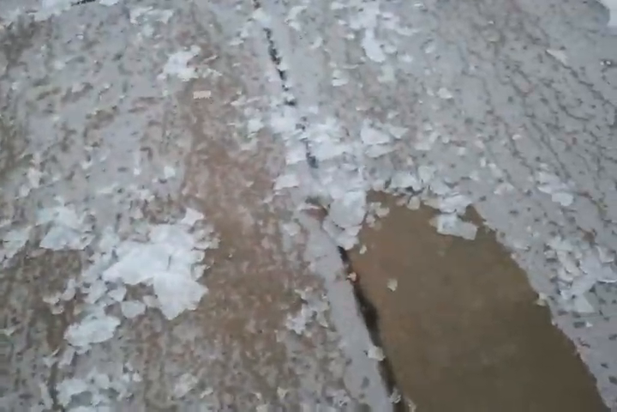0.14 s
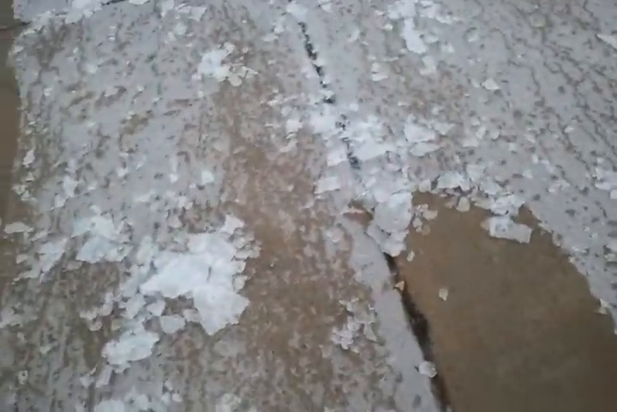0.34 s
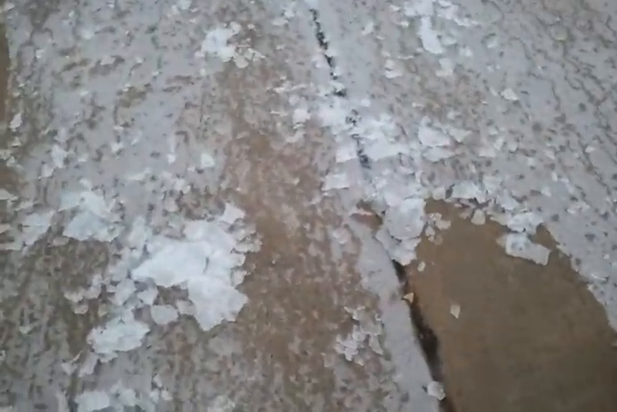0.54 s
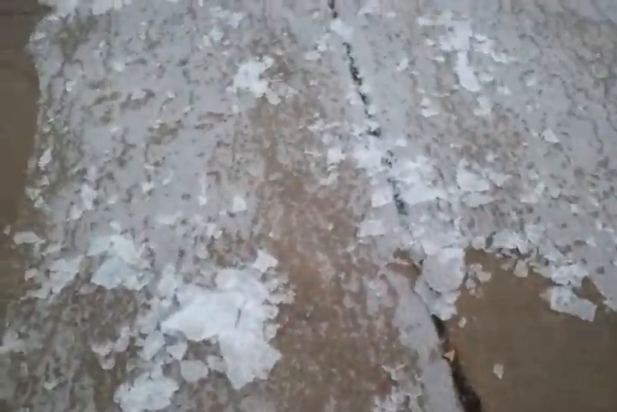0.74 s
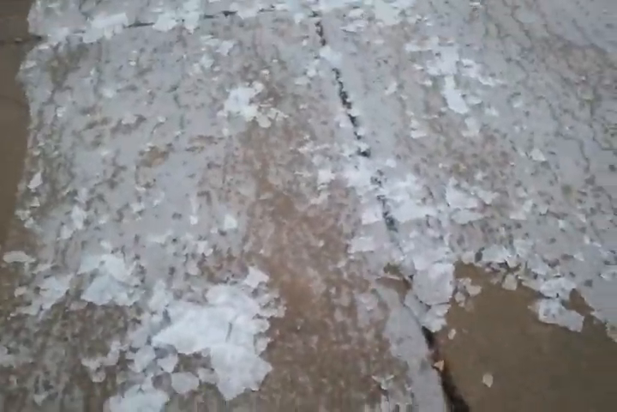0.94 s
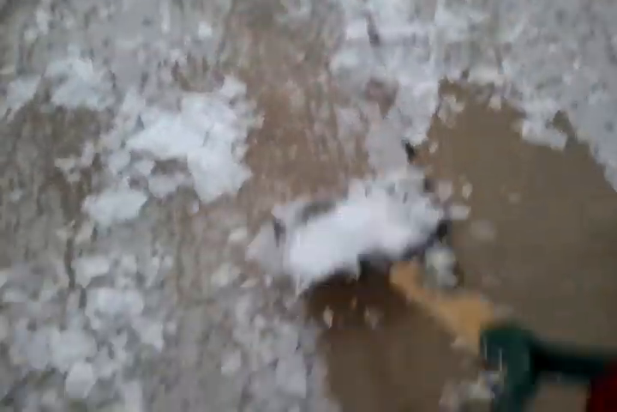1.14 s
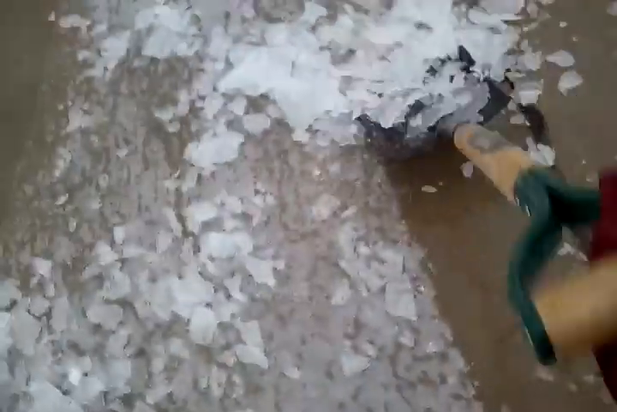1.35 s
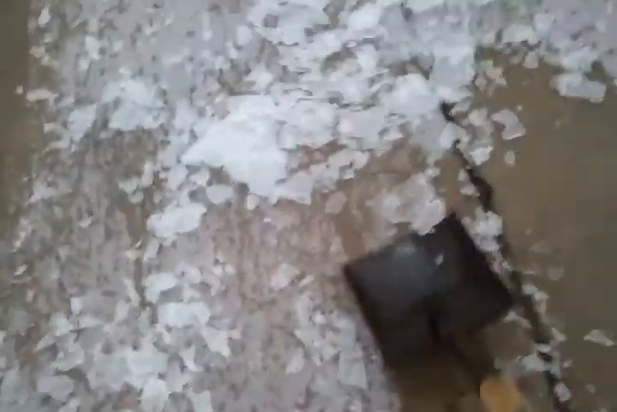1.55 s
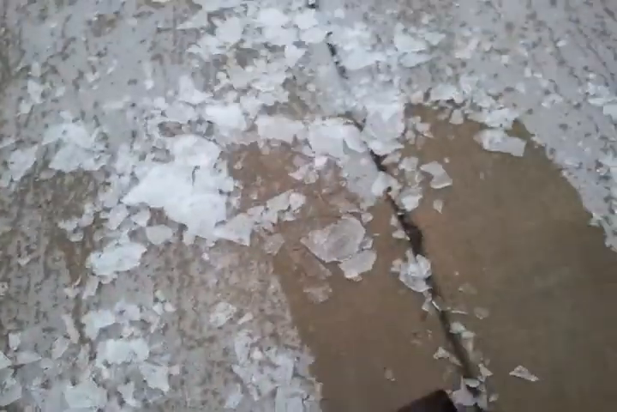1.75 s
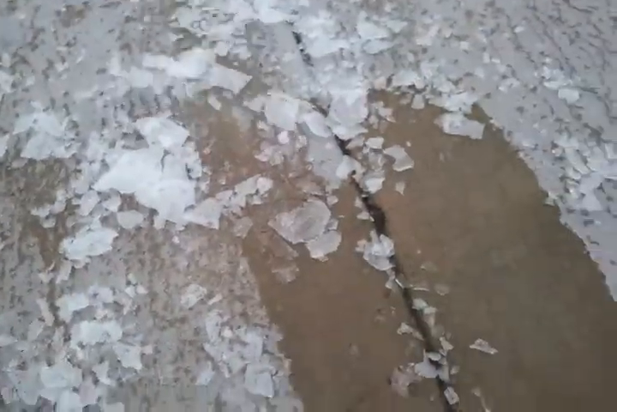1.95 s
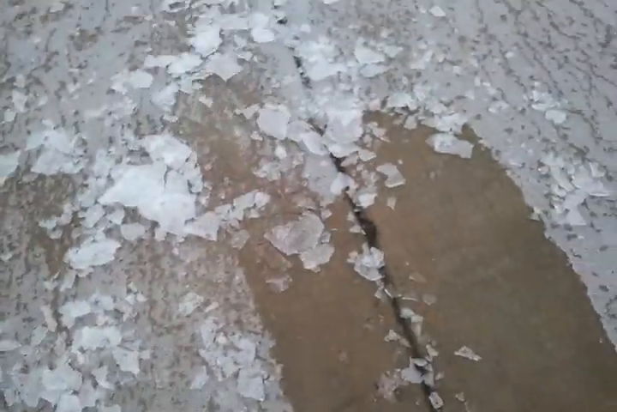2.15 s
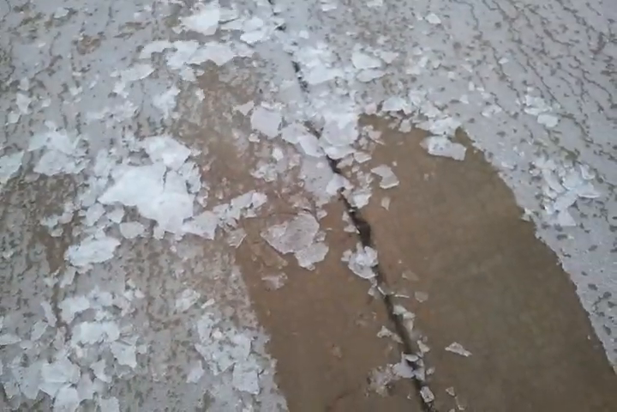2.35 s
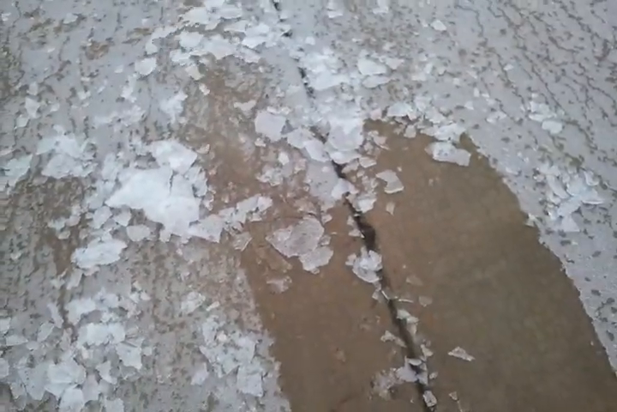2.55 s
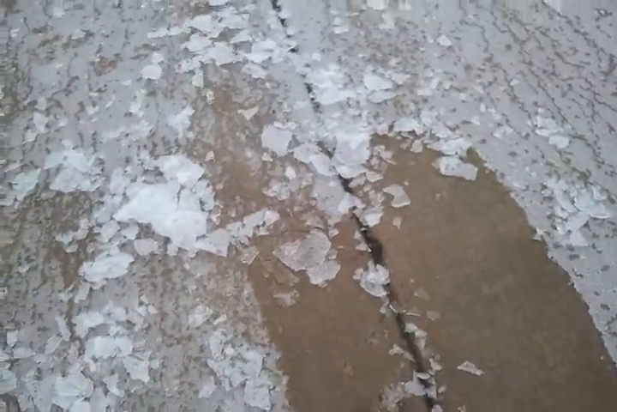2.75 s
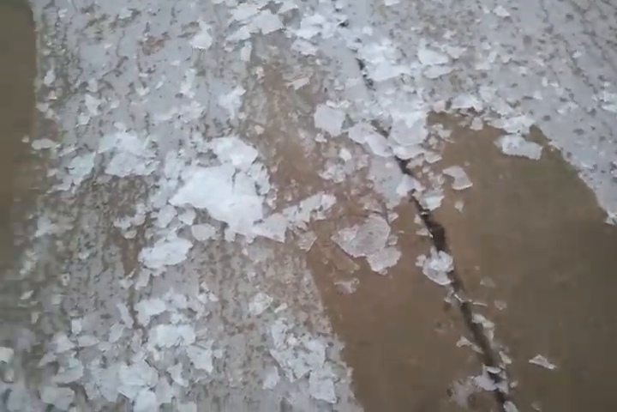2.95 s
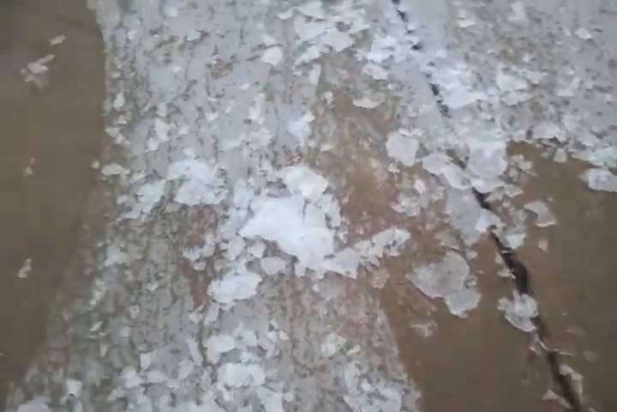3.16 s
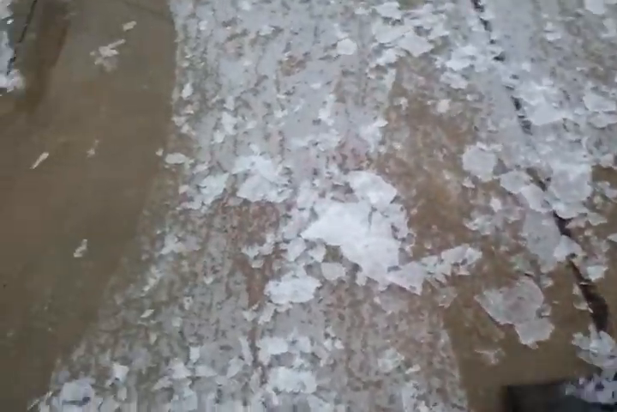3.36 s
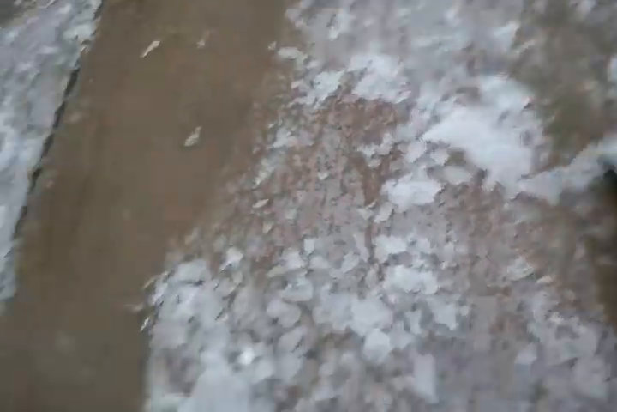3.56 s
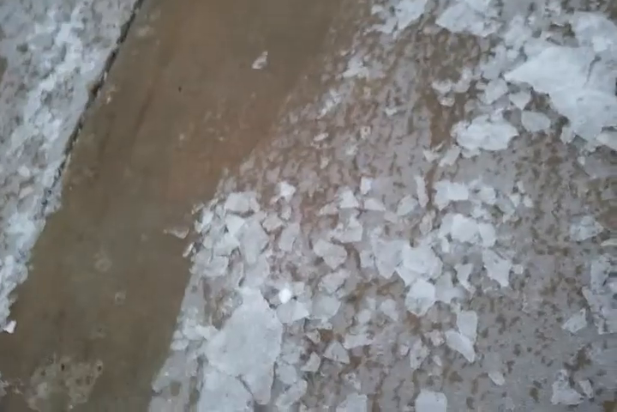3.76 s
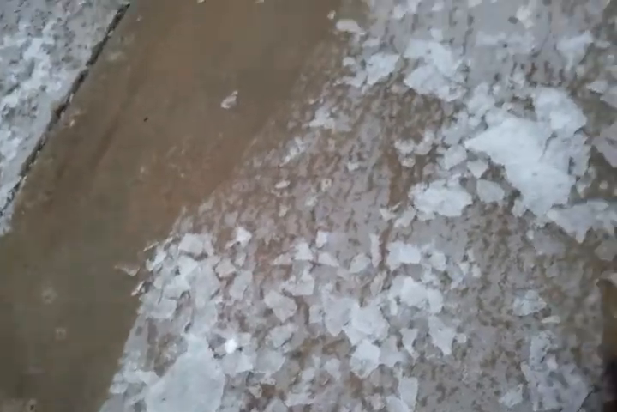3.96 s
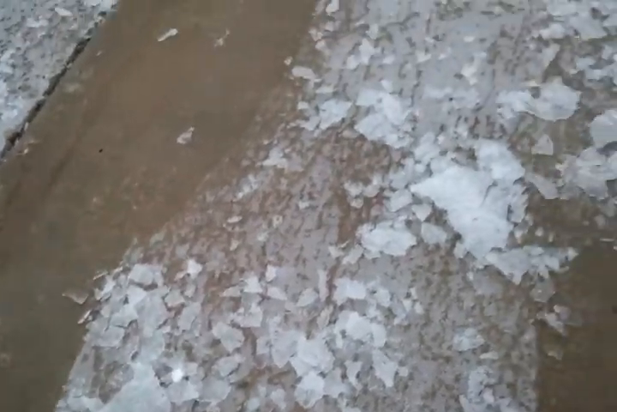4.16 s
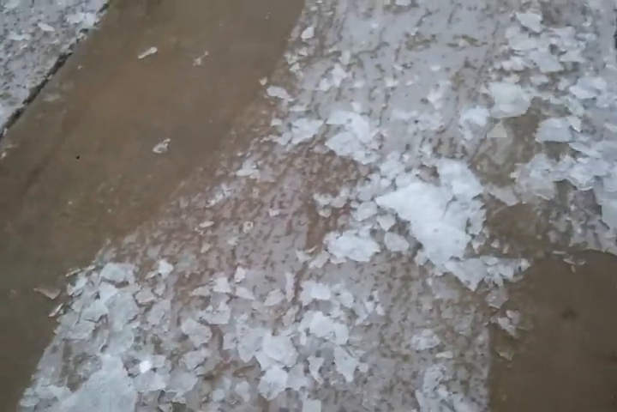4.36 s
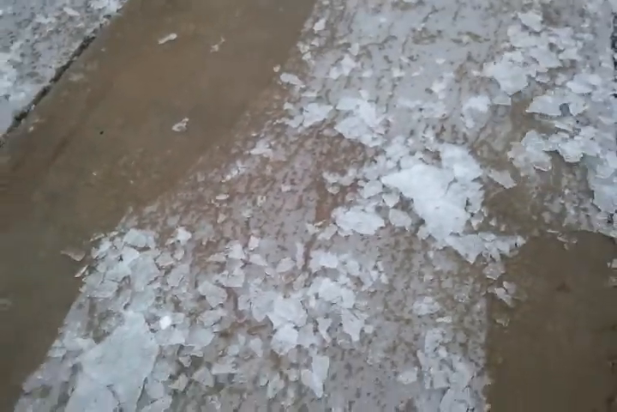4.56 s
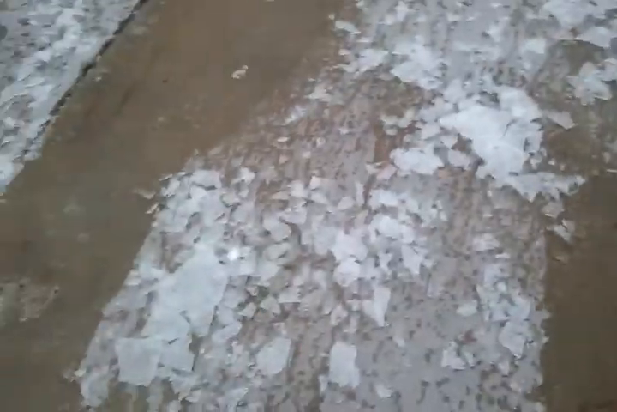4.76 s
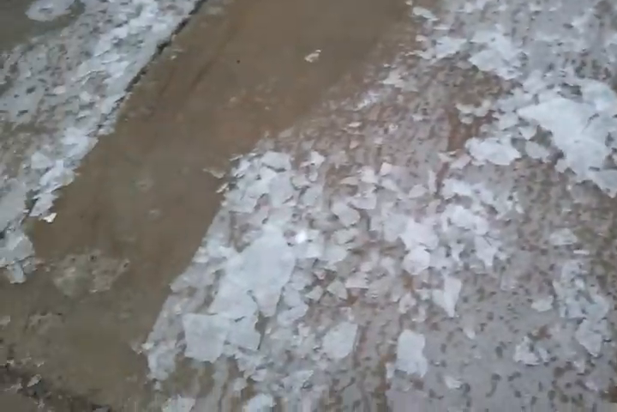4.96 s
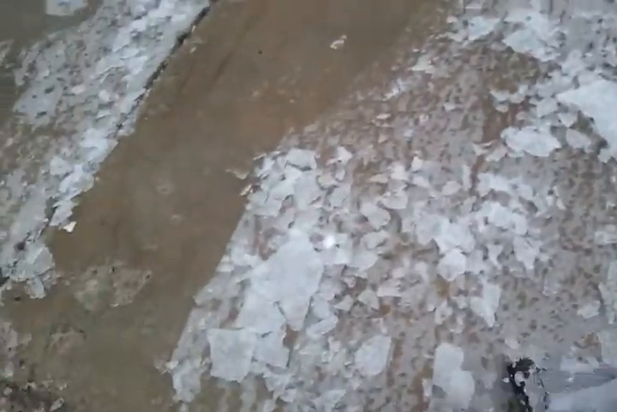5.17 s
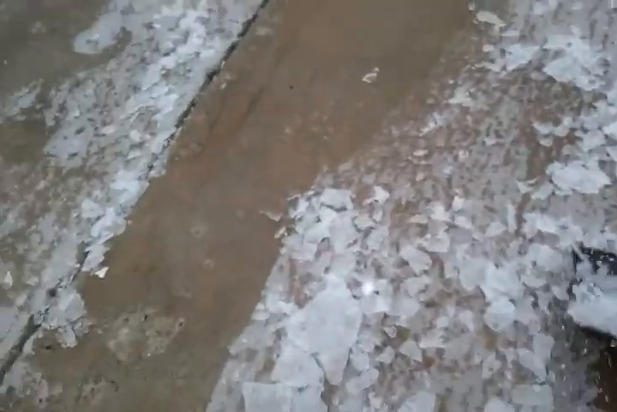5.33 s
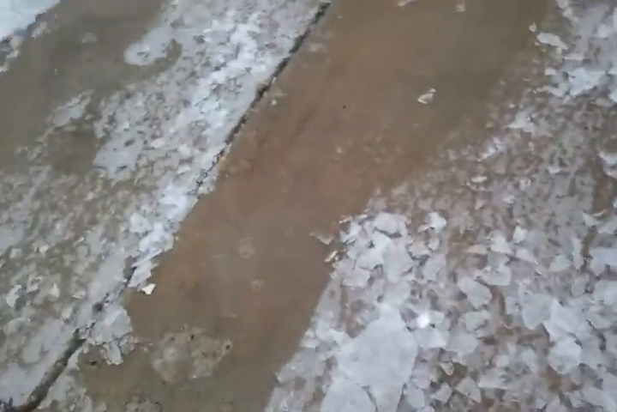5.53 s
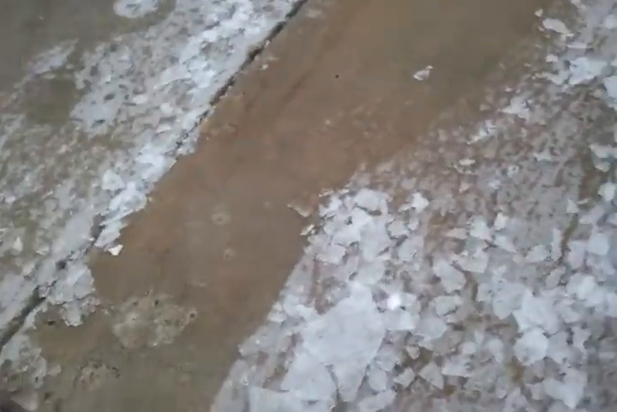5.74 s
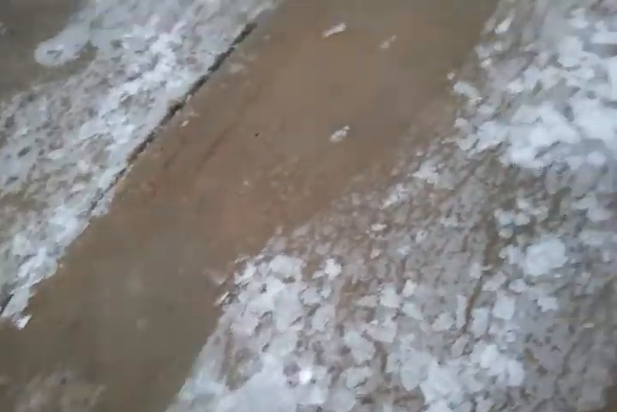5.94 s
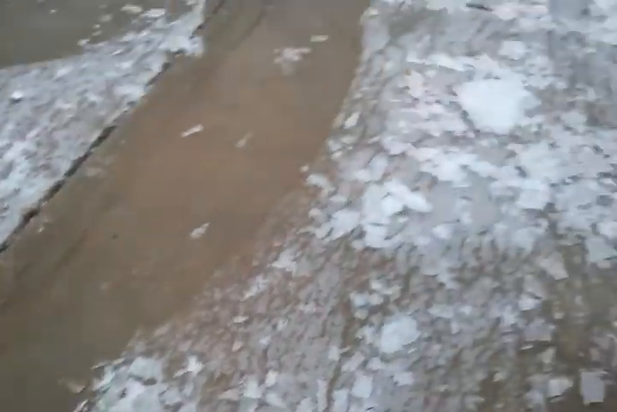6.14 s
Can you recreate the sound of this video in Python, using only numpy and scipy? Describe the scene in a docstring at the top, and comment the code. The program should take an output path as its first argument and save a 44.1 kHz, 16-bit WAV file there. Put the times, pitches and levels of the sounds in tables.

```python
"""Gritty scrapes, stroke after stroke: a small steel shovel is pushed under ice on a concrete driveway.
The edge grinds and squeals, the crust crumbles and the shaken blade drones; loose shards skitter away
and tick against each other. Now and then the blade chops down and bounces, ringing.
Outdoors over faint background air, with the microphone close enough to overload on the hard pushes."""
import sys
import numpy as np
from scipy import signal
from scipy.fft import rfft, irfft
from scipy.io import wavfile
from scipy.ndimage import map_coordinates

SR = 44100
rng = np.random.default_rng(int(sys.argv[2]) if len(sys.argv) > 2 else 0)


def persist_wave(psi):
    """Save psi, clipped to +-1, as 16-bit WAV."""
    counts = np.round(np.clip(psi, -1, 1) * 32767).astype(np.int16)
    wavfile.write(sys.argv[1], SR, np.atleast_2d(counts).T)


N = 273420

# modes of the steel blade: (pitch [Hz], struck flat [dB], struck on the corner [dB], free t60 [s])
BLADE_MODES = [(523, -23.5, -28, 1), (688.7, 0, -8, 0.71), (734, -5, -25, 0.31), (782, -1.5, -2, 0.32),
               (946, -11.5, -14, 0.05), (1016, -41, -2.5, 0.51), (1563, -6, -7.5, 0.6),
               (1615, -7, -13, 0.55), (1895, -16, -15, 0.46), (2010, -25, -39, .25), (2250, -8, -12, 0.49),
               (2356, -9.5, -26, 0.15), (2800, -7.5, -5.5, 0.64), (2940, 1.5, 7, 0.18),
               (3110, -16, -14, 0.095), (3260, -9.5, 8, 0.13), (3390, -12, -2, .15), (3810, -3, 5, 0.26),
               (3920, 0.5, 8, 0.26), (4810, 3, 2, 0.17), (5030, -10, 2, .14), (5800, -19, -11, .2),
               (6500, -12, -16, .2)]


def scrape(judder_db, stutter_db):
    """The edge catches and slips; each catch crushes grit, breaks crust and shakes the blade."""
    # spectrum of grit under the edge: (frequency [Hz], level [dB])
    grit_spectrum = [(30, -2.5), (150, -15), (480, -18), (640, -7.5), (1100, -9.5), (2100, -14),
                     (3000, -6.5), (3800, -3.5), (4600, -5), (5800, -0.5), (7000, 1.5), (8000, 2)]
    # spectrum of the breaking crust: (frequency [Hz], level [dB])
    crunch_spectrum = [(30, -16), (150, -18.5), (480, -9.5), (640, -1), (1000, -3.5), (1400, -1),
                       (2200, -1.5), (3200, -3.5), (6000, -9)]
    grinding, breaking, shaking = pushing()
    judder = rms_one(from_db(judder_db * drift(76) + stutter_db * drift(30)))
    grit = from_db(0.23) * colour(grains(per_s=22000, spread_db=2.0), grit_spectrum)
    edge = grit + squeals(fade_s=0.012)
    crunch = colour(grains(per_s=5000, spread_db=2.5), crunch_spectrum)
    return judder * (grinding * edge + breaking * crunch + shaking * drone(tilt_db_per_octave=-3.0))


def pushing(bite_s=0.027, let_go_t60_s=0.11, drone_t60_s=0.31, drone_follows=0.32):
    """Strength of grit, crunch and drone: each push bites, swells or eases steadily, and lets go."""
    # pushes and brief skips of the edge:
    # (start [s], end [s], grit at first [dB], grit at last [dB], crunch [dB re grit], drone [dB])
    pushes = [(0, 0.253, -38, -24, -8.5, -34), (0.246, 0.275, -18, -6.5, -3.5, -17),
              (0.297, 0.483, -3.5, -13.5, -4.5, -20), (0.509, 0.57, -18, -16.5, -1.5, -26.5),
              (0.572, .68, -13, -7.5, -4.5, -28), (0.874, 0.933, -16, -16, -6, -28),
              (.912, 1.153, -6, -4.5, -3.5, -28), (1.153, 1.418, -10.5, -10.5, -0.5, -23.5),
              (1.428, 1.571, -22, -27, 1.5, -31), (1.58, 1.718, -12.5, -11, -9, -37),
              (1.708, 1.83, -18, -19, -13, -22), (1.954, 2.11, -25, -18, -8, -24),
              (1.832, 1.851, -1, -3.5, -10, -23), (1.924, 1.948, -3.5, -10.5, -6, -20),
              (2.023, 2.049, -8, -5, -8.5, -20), (3.026, 3.332, -20, -12, -14.5, -30),
              (3.325, 3.548, -10.5, -5, -9, -20), (3.541, 3.712, -6.5, -5.5, -8.5, -15),
              (3.702, 3.78, -11, -9, -1.5, -21), (4.941, 5.1, -6, -13, -6.5, -19),
              (5.106, 5.187, -10.5, -8, -5, -26), (5.198, 5.257, -11, -7.5, -5, -25),
              (5.269, 5.51, -4.5, -8.5, -3.5, -20), (5.49, 5.696, -6, -8.5, -4.5, -12),
              (6.1, 6.202, -12.5, -6.5, -12, -17)]
    t, power = np.arange(N) / SR, np.zeros((3, N))
    for start, end, first_db, last_db, crunch_db, drone_db in pushes:
        at = slice(round(start * SR), round(end * SR) + SR // 2)
        bite = np.clip((t[at] - start) / bite_s, 0, 1)
        after = np.maximum(t[at] - end, 0)
        grit_db = np.interp(t[at], [start, end], [first_db, last_db])
        grit = bite * from_db(grit_db) * decay(after, let_go_t60_s)
        swell_db = drone_follows * (grit_db - (first_db + last_db) / 2)
        shaking = bite * from_db(drone_db + swell_db) * decay(after, drone_t60_s)
        power[:, at] += np.square([grit, grit * from_db(crunch_db), shaking])
    return np.sqrt(power)


def squeals(fade_s):
    """Stick and slip excite a narrow resonance of the edge for part of a stroke."""
    # where the edge bites and squeals: (start [s], end [s], pitch [Hz], width [Hz], level [dB])
    bites = [(0, 0.62, 2840, 250, -13), (.3, .5, 3800, 400, -16), (1.067, 1.154, 3400, 150, -8),
             (1.9, 2.204, 3060, 300, -13), (3.08, 3.414, 1610, 200, -17), (3.03, 3.193, 2995, 299.7, -9),
             (3.1, 3.459, 3500, 350, -9.5), (3.1, 3.682, 7350, 400, -12), (3.398, 3.808, 5997, 400.2, -15),
             (4.92, 5.051, 2930, 280, -6), (5.2, 5.602, 6500, 900.7, -9), (5.5, 5.677, 1329, 110, -9),
             (5.55, 5.722, 2164, 110, -7)]
    t, out = np.arange(N) / SR, np.zeros(N)
    slips = grains(per_s=8900, spread_db=4.5)
    for start, end, hz, width_hz, db in bites:
        window = np.clip(np.minimum(t - start, end - t) / fade_s, 0, 1)
        resonance = signal.iirpeak(hz, hz / width_hz, fs=SR)
        out += from_db(db) * window * rms_one(signal.lfilter(*resonance, slips))
    return out


def drone(tilt_db_per_octave, pressed_t60_s=0.077, lifted_t60_s=0.23):
    """Catches shake the blade: a rough drone when the ground damps it, a wavering ring when lifted."""
    # the changing load bends the blade's pitch: (time [s], pitch [ratio], lift off the ground [0-1])
    load = [(0, 1.04, 1), (.7, 0.96, 0), (1.0, 1.03, 0.33), (1.45, 0.95, 0.07), (1.7, 0.98, 1),
            (2.2, 1.01, 0.8), (3.0, 0.9, 0.6), (3.55, .91, 0.6), (3.8, 1.033, 0.1), (5.6, 1.008, 0.17),
            (6.2, 1.03, 0.7)]
    pitch_ratio, lift = in_time(load)
    catches = grains(per_s=2500, spread_db=2.5)
    pivot_hz = BLADE_MODES[1][0]
    pressed, lifted = np.zeros((2, N))
    for hz, flat_db, _, _ in BLADE_MODES:
        gain = from_db(flat_db + tilt_db_per_octave * np.log2(hz / pivot_hz))
        shaking = gain * catches * rng.standard_normal(N)
        pressed += ring(shaking, hz, pressed_t60_s)
        lifted += ring(shaking, hz, lifted_t60_s)
    blade = (1 - lift) * rms_one(pressed) + lift * rms_one(lifted)
    return rms_one(map_coordinates(blade, [np.cumsum(pitch_ratio)], order=3, mode="mirror"))


def blows(crush_t60_s):
    """Ice is crushed while the edge bears down; the blade rings, the longer the freer it is."""
    # the blade hits the ground: (time [s], crunch [dB], contact [s], treble limit [Hz], ring [dB],
    # struck on the corner [0-1], freedom to ring [0-1])
    hits = [(0.075, -23, 0.0062, 5000, -34, 0.14, 0.7), (0.101, -30, 0.0068, 4000, -22.5, 0, 0.19),
            (0.508, -10.5, 0.0038, 9000, -34, 0.9, .3), (0.882, -10.5, 0.0016, 7000, -24, 0, 0.15),
            (0.921, -8, 0.0073, 9000, -35, 0.1, 0), (1.70, -25, 0.0094, 4000, -14, 0.02, 0.55),
            (1.846, -9, 0.012, 1800, -21, 0, 1), (1.975, -35, 0.007, 2000, -20, 0, 0.86),
            (2.142, -15.5, 0.011, 8900, -43, 0.16, .6), (2.189, -16, .010, 9000, -29, 0.25, 0.82),
            (2.294, -17.5, 0.0068, 9000, -35, 0.6, 0.2), (3.051, -16, 0.0067, 9000, -41, 0.27, 0.3),
            (3.762, -12, .010, 3000, -29, .3, 0.29), (3.885, -7, 0.006, 1100, -19, 0.25, 0.24),
            (4.295, -3, 0.024, 12100, -13.5, 0, 0.8), (4.486, -5.5, 0.018, 12000, -15.5, 0.93, 0.56),
            (4.602, -15, 0.0053, 12100, -29, 0.5, 0.6), (4.615, -9.5, 0.0097, 6900, -19.5, 0.14, 0.39),
            (4.663, -22, 0.019, 9000, -33, .6, 0.8), (4.713, -13, 0.0057, 12000, -30, 0.9, 0.74),
            (4.775, -27, 0.0097, 6000, -29, 0, 0.06), (4.954, -10, 0.014, 12000, -25, 0.7, 0.8)]
    # spectrum of ice crushed by a blow: (frequency [Hz], level [dB])
    crush_spectrum = [(30, 4), (150, -18), (400, -8), (750, 1), (1300, -4), (2200, -5.5), (3200, 2),
                      (4800, -4), (7000, 3.5), (8000, 5)]
    t, out = np.arange(SR) / SR, np.zeros(N + SR)
    ring_samples = SR * 2 // 3
    hz, flat_db, corner_db, t60 = np.transpose(BLADE_MODES)[:, :, None]
    crush = colour(grains(per_s=12000, spread_db=2.0), crush_spectrum)
    for start, crunch_db, contact_s, top_hz, ring_db, corner, freedom in hits:
        at = round(start * SR)
        bearing = from_db(crunch_db) * decay(np.maximum(t - contact_s, 0), crush_t60_s)
        dull = signal.butter(2, top_hz, fs=SR, output="sos")
        out[at:at + SR] += signal.sosfilt(dull, bearing * crush[at:at + SR])
        mode_db = ring_db + flat_db + corner * (corner_db - flat_db) + rng.normal(0, 0.43, hz.shape)
        strength = from_db(mode_db) / np.hypot(1, hz / top_hz)  # a soft contact spares the high modes
        since = np.maximum(t[:ring_samples] - contact_s * rng.random(hz.shape), 0)
        dying = decay(since, t60 * max(freedom, 0.05))
        out[at:at + ring_samples] += np.sum(strength * dying * np.sin(2 * np.pi * hz * since), axis=0)
    return out[:N]


def skitter(flutter_db, clink_db):
    """Flakes hiss over the rough ground, the larger ones rattle, and they clink where they meet."""
    # spectrum of small sliding flakes: (frequency [Hz], level [dB])
    hiss_spectrum = [(30, -4), (150, -15.5), (500, -15.5), (680, -23.5), (1400, -19), (2400, -6),
                     (4200, -4), (5000, -2.5), (6000, -0.5), (7100, -1.5), (8000, 0)]
    # spectrum of the larger flakes: (frequency [Hz], level [dB])
    rattle_spectrum = [(30, -30), (150, -15.5), (500, -23.5), (680, -5.5), (1300, 4), (2300, 4), (3500, -3),
                       (6000, -6.5)]
    # flake size, heard as the weight of the rattle: (time [s], level [dB re hiss])
    bulk = [(0, -0.5), (.8, -4), (1.5, -9), (1.9, -6), (2.3, -8), (2.9, -4), (3.3, -0.5), (4.0, -10.5),
            (4.3, -6.5), (4.9, -6), (5.8, -10.5), (6.0, -2.5), (6.2, -4.5)]
    bulk_db, = in_time(bulk)
    hiss = colour(grains(per_s=20000, spread_db=3.0), hiss_spectrum)
    rattle = from_db(bulk_db) * colour(grains(per_s=7000, spread_db=3.0), rattle_spectrum)
    clink = from_db(clink_db) * clinks(per_s=1800, spread_db=3.0, cycles=22)
    return sliding() * from_db(-4.0 + flutter_db * drift(45)) * (hiss + rattle + clink)


def sliding(settling_db=-27.5):
    """Strength of the sliding ice: each spill gathers, then friction slows it; the spills overlap."""
    # broken ice spills over the concrete: (peak time [s], level [dB], time to gather [s], fade [dB/s])
    spills = [(.72, -18, 0.042, 32), (1.1, -10, 0.26, 10), (1.56, -13, 0.073, 16), (2.44, -22, 0.12, 25),
              (3.72, -11.5, 0.22, 36), (4.044, -15.5, 0.11, 77), (4.24, -23.5, 0.11, 22.5),
              (5.62, -7.5, 0.33, 18.5), (6.0, -13, 0.26, 2)]
    t = np.arange(N) / SR
    power = np.full(N, from_db(settling_db) ** 2)  # the flakes never quite stop shifting
    for peak_s, db, gather_s, fade_db_per_s in spills:
        gathering = np.clip(1 + (t - peak_s) / gather_s, 0, 1)
        slowing = from_db(db - fade_db_per_s * np.maximum(t - peak_s, 0))
        power += (gathering * slowing) ** 2
    return np.sqrt(power)


def clinks(per_s, spread_db, cycles, sizes=36):
    """Colliding plates of ice: each size rings briefly at a pitch of its own."""
    clicks = grains(per_s, spread_db)
    size = rng.integers(0, sizes, N)
    pitches = np.linspace(1900, 8000, sizes) + rng.uniform(-80, 80, sizes)
    return rms_one(sum(ring(clicks * (size == k), hz, cycles / hz) for k, hz in enumerate(pitches)))


def ticks(snap_t60_s, half_width_octaves, samples=2000):
    """A shard snaps in a crackle of a few milliseconds, pitched by its size."""
    # single shards snap or land: (time [s], peak level [dB], pitch [Hz])
    snaps = [(.118, -6, 6500), (.191, -13.5, 3020), (.545, -9, 3500), (.578, -6, 7000), (.694, -6, 7000),
             (.784, -7, 5000), (.844, -8, 4270), (1.524, -4.5, 4020), (2.15, -1, 7000), (2.265, -7, 6500),
             (2.41, -6, 7260), (2.457, -6, 3320), (2.512, -12, 2600), (2.732, -20, 5800), (3.104, -8, 6500),
             (3.916, -9, 5800), (3.986, -3.5, 6000), (4.051, -5, 7000), (4.088, -5, 6500),
             (4.185, -10, 4800), (4.218, -11, 6500), (4.858, -20, 6500)]
    t, out = np.arange(samples) / SR, np.zeros(N + samples)
    for start, db, hz in snaps:
        at = round(start * SR)
        edges_hz = np.clip([hz / 2 ** half_width_octaves, hz * 2 ** half_width_octaves], 100, 8600)
        burst = rng.standard_normal(samples) * decay(t, snap_t60_s)
        snap = signal.sosfilt(signal.butter(2, edges_hz, "band", fs=SR, output="sos"), burst)
        out[at:at + samples] += from_db(db) * snap / np.abs(snap).max()
    return out[:N]


def outdoor_air(level_db):
    """A faint, steady rush and rumble lies behind the work on the driveway."""
    # spectrum of the outdoor background: (frequency [Hz], level [dB])
    air_spectrum = [(20, -8.5), (60, -15), (200, -29.5), (700, 8), (3000, -27)]
    return from_db(level_db) * colour(rng.standard_normal(N), air_spectrum)


def grains(per_s, spread_db):
    """Random clicks, many small and a few large."""
    sizes = from_db(spread_db * np.minimum(rng.exponential(1, N), 5))
    return (rng.random(N) < per_s / SR) * sizes * rng.choice([-1, 1], N)


def ring(x, hz, t60):
    """A resonator: a unit click sets a sine of height 1 ringing."""
    r, w = decay(1 / SR, t60), 2 * np.pi * hz / SR
    return signal.lfilter([0, np.sin(w)], [1, -2 * r * np.cos(w), r * r], x + 1e-18)


def colour(x, spectrum, top_hz=8700):
    """Shape a sound by a spectrum that closes above the band of the microphone; rms 1."""
    hz = np.maximum(np.arange(N // 2 + 1) * SR / N, 1)
    points_hz, points_db = np.transpose(spectrum)
    gain = from_db(np.interp(np.log(hz), np.log(points_hz), points_db))
    return rms_one(irfft(rfft(x) * gain / np.sqrt(1 + (hz / top_hz) ** 24), N))


def drift(rate_hz, step=20):
    """A smooth random wander of rms 1, mostly slower than rate_hz."""
    r = np.exp(-2 * np.pi * rate_hz * step / SR)
    slow = signal.lfilter([1], [1, -2 * r, r * r], rng.standard_normal(N // step + 2002))[2000:]
    return np.interp(np.arange(N) / step, np.arange(len(slow)), rms_one(slow))


def in_time(rows):
    """One value per sample for each column of a curve."""
    times, *columns = np.transpose(rows)
    return [np.interp(np.arange(N) / SR, times, column) for column in columns]


def decay(t, t60):
    """A gain that falls 60 dB every t60 seconds."""
    return from_db(-60 * t / t60)


def from_db(db):
    """Decibels to gain."""
    return 10 ** (np.asarray(db) / 20)


def rms_one(x):
    """Scale to unit rms."""
    return x / np.sqrt(np.mean(x ** 2) + 1e-20)


def scene():
    """Shovel and ice close to one microphone, in the open air."""
    shovel = scrape(judder_db=2.06, stutter_db=0.53) + blows(crush_t60_s=0.068)
    ice = skitter(flutter_db=1.26, clink_db=-10) + ticks(snap_t60_s=0.015, half_width_octaves=0.61)
    return (shovel + ice + outdoor_air(level_db=-41))[None]


def record(dry):
    """A narrow-band recorder: the input clips, bass and treble are cut, the output rounds overshoots."""
    overload, knee = 0.75, 16  # a high power makes a hard knee
    low_cut_hz, band_top_hz, output_top_hz = 157, 8100, 15800
    clipped = np.clip(dry, -overload, overload)
    band = signal.firwin(95, band_top_hz, window=("kaiser", 7), fs=SR)[None]
    narrow = signal.fftconvolve(clipped, band, mode="same")
    thin = signal.sosfilt(signal.butter(1, low_cut_hz, "high", fs=SR, output="sos"), narrow)
    rounded = thin / (1 + np.abs(thin / overload) ** knee) ** (1 / knee)
    top = signal.firwin(255, output_top_hz, window=("kaiser", 9), fs=SR)[None]
    return signal.fftconvolve(rounded, top, mode="same")


dry = scene()
out = record(dry)
persist_wave(out)
```